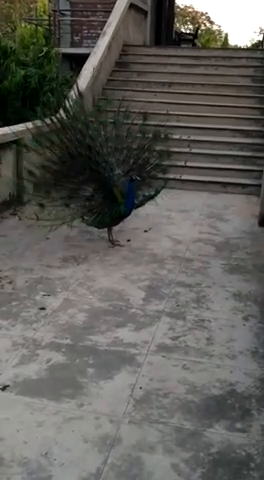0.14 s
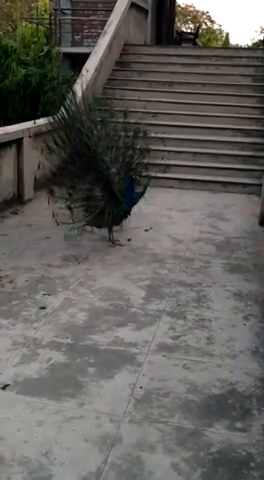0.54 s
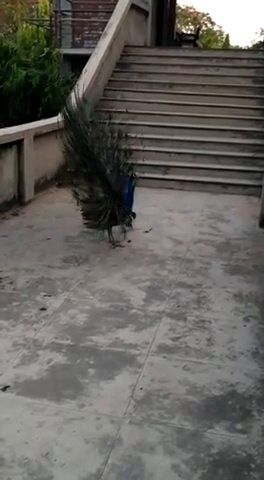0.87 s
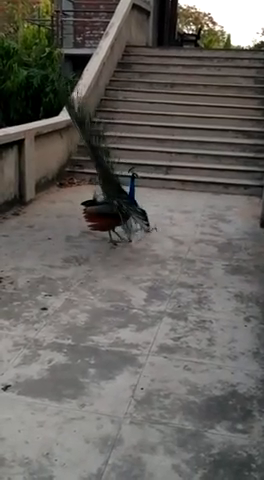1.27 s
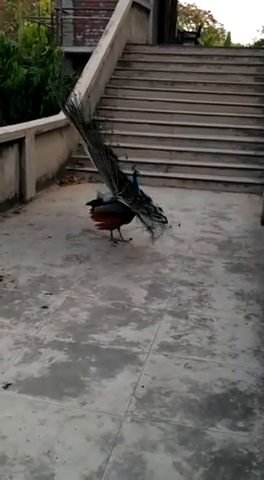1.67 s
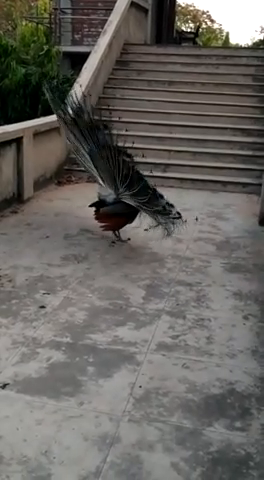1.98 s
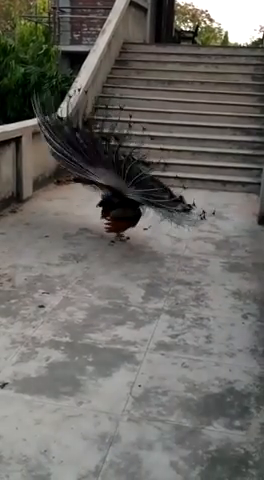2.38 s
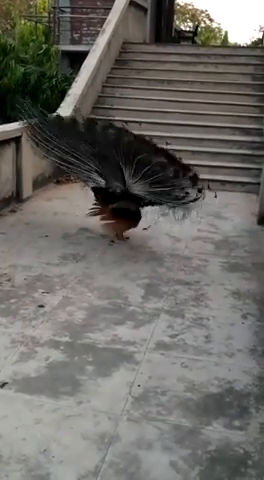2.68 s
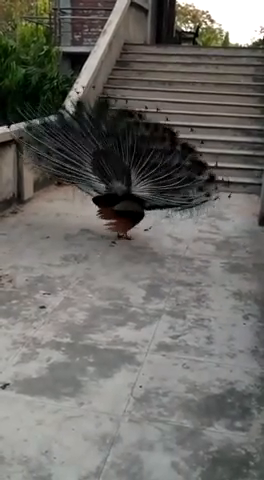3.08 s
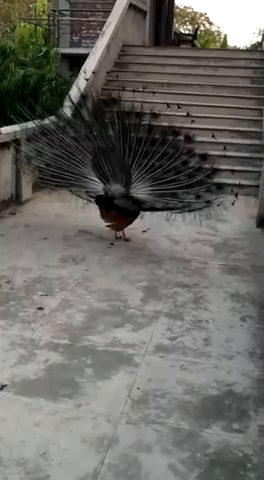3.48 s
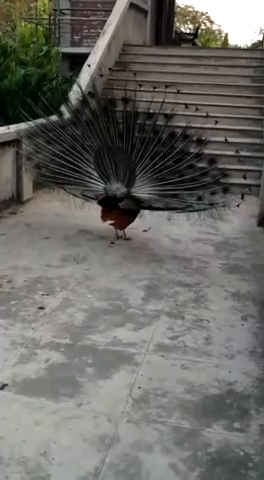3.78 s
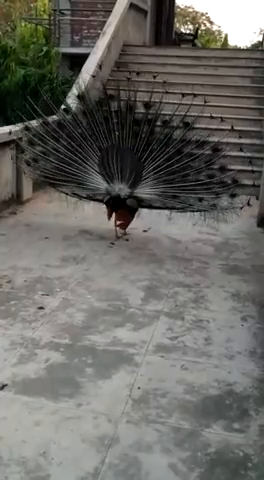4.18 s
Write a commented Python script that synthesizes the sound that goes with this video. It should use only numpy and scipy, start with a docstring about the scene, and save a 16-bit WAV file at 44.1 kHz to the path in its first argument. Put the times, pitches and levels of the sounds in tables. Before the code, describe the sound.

A quiet paved court with dull distant outdoor noise, a low wavering engine-like hum and a thin, very high whine throughout. A faint feather brush comes at 0.15 s, then a hard, dry click close to the microphone at 0.72 s. Soft airy brushes follow at about 1.2, 1.4 and 1.75 s. A small bird gives a hoarse peep near 1.4 s, then eight thin chirps slurring upward, roughly every quarter second from 1.5 to 3.2 s. Farther off, a soft low double hoot at 2.05 s leads to rough falling slurs until 2.3 s. The feather train flurries briefly at 2.4 s, then shivers from 2.6 s: crisp sizzling hiss, scraping shafts, light rattle and snapping quills, peaking around 2.8 to 2.9 s. It ebbs by 3.6 s with small ticks. Afterwards only faint brushes and the quiet background remain, the hum surging around 3.7 and 4.05 s.

```python
"""A peacock turns on a paved court and shivers its fanned train: stick-slip noise of barbs and shafts, ticking quills.
A small bird repeats a rising chirp (frayed gliding tones), others call farther off, and damped modes
make one sharp click close to the microphone. Under it lie a low wavering hum, distant outdoor noise
and a thin whine, all tones and filtered noise; steps and walls answer faintly with a diffuse tail."""
import sys
import numpy as np
from scipy import signal
from scipy.fft import rfft, irfft, next_fast_len
from scipy.io import wavfile
from scipy.ndimage import uniform_filter1d, map_coordinates

SR = 44100
rng = np.random.default_rng(int(sys.argv[2]) if len(sys.argv) > 2 else 0)


def log_audio(samples):
    """Write samples as a 16-bit WAV file to the path given in sys.argv[1]."""
    # one column per channel
    frames = np.atleast_2d(samples).T
    # limit to full scale, then quantise
    limited = np.clip(frames, -1, 1)
    pcm = np.round(limited * 32767).astype(np.int16)
    wavfile.write(sys.argv[1], SR, pcm)


N = 190776
T = np.arange(N) / SR  # time in s


def amp(db):
    """Decibels to amplitude gain."""
    return 10 ** (np.asarray(db) / 20)


def unit(x):
    """Normalisation to rms 1."""
    return x / np.sqrt(np.mean(x ** 2) + 1e-20)


def along(points, hz):
    """Interpolation of (pitch_hz, value) points on a logarithmic frequency axis."""
    f, v = np.transpose(points)
    return np.interp(np.log(hz + 1), np.log(f), v)


def filtered(x, response):
    """Linear filtering: the spectrum of x times a response of frequency."""
    size = next_fast_len(N + 8192)
    return irfft(rfft(x, size) * response(np.fft.rfftfreq(size, 1 / SR)), size)[:N]


def coloured(x, spectrum):
    """Spectral shaping: x filtered by (pitch_hz, level_db) points, at rms 1."""
    return unit(filtered(x, lambda hz: amp(along(spectrum, hz))))


def noise():
    """Fresh white Gaussian noise."""
    return rng.standard_normal(N)


def narrow(centre_hz, width_hz):
    """Resonance-shaped band of noise at rms 1."""
    return unit(filtered(noise(), lambda hz: 1 / (1 + ((hz - centre_hz) / width_hz) ** 2)))


def patchy(x, depth_db):
    """Time-frequency modulation: slow random patches of gain, at rms 1."""
    z = signal.stft(x, nperseg=1024)[2]
    field = uniform_filter1d(rng.standard_normal(z.shape), size=4, axis=0)
    field = uniform_filter1d(field, size=10, axis=1)
    return unit(signal.istft(z * amp(depth_db * unit(field)), nperseg=1024)[1][:N])


def wobble(rate):
    """Band-limited random modulation: a smooth curve with rate knots a second."""
    return map_coordinates(rng.standard_normal(2048), [T * rate], mode="wrap")


def bumps(rows):
    """Superposition of rounded humps from (middle_s, half_width_s, height) rows."""
    return sum(height * np.exp(-np.abs((T - s) / width) ** 3) for s, width, height in rows)


def fade(s, t60):
    """Free decay: a sudden start at s, then an exponential fall."""
    return (T >= s) * np.exp(-np.log(1000) * np.maximum(T - s, 0) / t60)


def swell(s, length, rise, t60):
    """Driven envelope: linear rise from s, exponential decay once length has passed."""
    return np.clip((T - s) / rise, 0, 1) * np.exp(-np.log(1000) * np.maximum(T - s - length, 0) / t60)


def slips(rate, spread_db, blur):
    """Stick-slip friction: impulses of unequal size over the blur of countless smaller ones."""
    sizes = noise() * amp(spread_db * np.clip(noise(), -2, 2))
    grains = (rng.random(N) < rate / SR) * sizes
    return unit(unit(grains) + blur * noise())


def whistle(rows, waver, flutter_db, rough):
    """Frequency and amplitude modulation: a tone along (start_s, pitch_hz, level_db), frayed by fast flutter."""
    s, hz, db = np.transpose(rows)
    pitch = uniform_filter1d(np.interp(T, s, hz), size=300) * (1 + waver * wobble(350))
    level = uniform_filter1d(amp(np.interp(T, s, db, left=-150, right=-150)), size=128)
    fray = 1 + rough * (wobble(hz.mean() / 6) + 1j * wobble(hz.mean() / 6))
    tone = np.imag(fray * np.exp(2j * np.pi * np.cumsum(pitch) / SR))
    return np.sqrt(2) * level * amp(flutter_db * wobble(160)) * tone


# spectral shape of the distant noise: pitch_hz [Hz], level_db [dB per Hz, relative]
OUTDOOR_SPECTRUM = [(20, -12.5), (45, -2), (65, 10.5), (130, 4.5), (220, -2.5), (400, -4.5), (900, -10),
                    (1500, -13.5), (2500, -20), (5000, -32), (9000, -32), (12500, -25.5), (14000, -26),
                    (15500, -42.5)]
# far-off swells: start_s [s], length_s [s], centre_hz [Hz], width_hz [Hz], level_db [dB]
FAR_SWELLS = [(0, 0.44, 1424, 110, -72), (0.265, 0.027, 1450, 170, -66), (1.213, 0.1, 1017, 249, -74),
              (2.062, 0.44, 950, 170, -70), (2.083, 0.14, 415, 78.6, -66.5),
              (2.341, 0.03, 1300, 250, -66.5), (4.197, 0.11, 910, 121.2, -74.5)]


def outdoors():
    """Broadband ambience: dull, shifting distant noise, with narrow-band swells passing through it."""
    drift = amp(.6 * wobble(5))
    out = amp(-65.5) * drift * coloured(patchy(noise(), depth_db=2.72), OUTDOOR_SPECTRUM)
    for s, length, centre_hz, width_hz, db in FAR_SWELLS:
        out += amp(db) * swell(s, length, rise=0.0053, t60=0.306) * narrow(centre_hz, width_hz)
    return out


# surges and dips of the hum: middle_s [s], half_width_s [s], level_db [dB change]
HUM_SURGES = [(1.52, 0.055, 6.5), (1.67, .03, -10), (3.01, 0.04, -13), (3.3, 0.14, 3), (3.46, .025, -13),
              (3.68, .095, 16), (3.865, 0.066, -19), (4.06, 0.14, 12)]
# faint overtones that do not surge: multiple [of the hum's pitch], level_db [dB before a slow waver]
HUM_OVERTONES = [(2, -81), (3, -82), (4, -83.5), (6, -82.5)]
HUM_HZ, HUM_DB, HUM_WAVER_DB = 98.8, -62.5, 1.37  # means of pitch and level; size of the waver
RUMBLE_DB, RUMBLE_HZ, RUMBLE_WIDTH_HZ = -13.5, 144, 43  # noise, in dB relative to the hum's strength


def hum():
    """Harmonic series: a wavering low tone like a distant engine; a rumble surges with its fundamental."""
    phase = 2 * np.pi * np.cumsum(HUM_HZ + 1.1 * wobble(14)) / SR
    strength = amp(HUM_DB + bumps(HUM_SURGES) + HUM_WAVER_DB * wobble(14))
    overtones = sum(amp(db + 2.5 * wobble(4.6)) * np.sin(k * phase) for k, db in HUM_OVERTONES)
    rumble = amp(RUMBLE_DB) * narrow(RUMBLE_HZ, RUMBLE_WIDTH_HZ)
    return strength * (np.sqrt(2) * np.sin(phase) + rumble) + np.sqrt(2) * overtones


def tones(lines):
    """Line spectrum: steady sines of random phase from (pitch_hz, level_db) rows."""
    return np.sqrt(2) * sum(amp(db) * np.sin(2 * np.pi * (hz * T + rng.random())) for hz, db in lines)


# lower cluster of the whine: pitch_hz [Hz], level_db [dB relative to the whine's level]
WHINE_CLUSTER = [(6202, -9), (6300, -1), (6502, -3)]
# steady tones above it: pitch_hz [Hz], level_db [dB]
STEADY_LINES = [(12500, -98.5), (13001, -85.5), (13103, -90)]
WHINE_REST_DB, WHINE_OPEN_DB = -84.5, -66  # the cluster's level in quiet, and its limit under strong treble
WHINE_OPENS_DB, WHINE_LAG_S = -81.5, .011  # treble level that opens it halfway; time constant


def whine(sound):
    """Level-dependent gain: the lower cluster and its hiss rise with other sound in their band; the top stays."""
    bed = coloured(noise(), [(3500, -14.0), (5000, -10.0), (6400, 3.5), (7400, -0.5), (8000, 0.5), (12000, -12.5)])
    cluster = tones(WHINE_CLUSTER) + amp(-8.0) * bed
    band = signal.butter(4, [4800, 6800], "band", fs=SR, output="sos")
    treble = signal.sosfilt(band, sound)
    power = np.abs(uniform_filter1d(treble ** 2, size=512))
    keep = np.exp(-1 / (WHINE_LAG_S * SR))
    opening = signal.lfilter([1 - keep], [1, -keep], power / (power + amp(WHINE_OPENS_DB) ** 2))
    level = amp(WHINE_REST_DB + (WHINE_OPEN_DB - WHINE_REST_DB) * opening)
    return level * cluster + tones(STEADY_LINES)


# decay of the court: pitch_hz [Hz], t60_s [s]
COURT_DECAY = [(200, 0.12), (1500, 0.39), (6000, 0.44), (14000, 0.24)]


def court(x):
    """Diffuse reverberation: steps and walls return a short tail, whose decay depends on frequency."""
    hz, t, z = signal.stft(rng.standard_normal(SR // 2), SR, nperseg=256)
    tail = signal.istft(z * amp(-60 * t / along(COURT_DECAY, hz)[:, None]), SR, nperseg=256)[1]
    return signal.fftconvolve(np.pad(x, (400, 0)), tail / np.linalg.norm(tail))[:N]  # delayed 400 samples


# notes of other birds: start_s [s], length_s [s], start_hz [Hz], end_hz [Hz], level_db [dB at mid-note]
BIRD_NOTES = [(2.029, 0.036, 775, 747, -58.5), (2.072, 0.047, 755, 748, -55.5),
              (2.105, 0.046, 3250, 2460, -70.5), (2.18, 0.026, 4180, 4070, -77),
              (2.204, 0.043, 4050, 3390, -64), (2.261, .034, 4300, 2704, -59),
              (2.278, 0.0398, 2797, 2365, -62)]
GLIDE_SETTLES = 1.9  # time constants of the falling pitch in one note


def other_birds():
    """Exponential glide: a soft double hoot and rough slurs swell and fade while the pitch falls and settles."""
    out = np.zeros(N)
    u = np.linspace(0, 1, 16)  # progress through a note
    fall = (1 - np.exp(-GLIDE_SETTLES * u)) / (1 - np.exp(-GLIDE_SETTLES))
    arch_db = -14 * (2 * u - 1) ** 2
    for s, length, start_hz, end_hz, db in BIRD_NOTES:
        note = np.transpose([s + length * u, start_hz + (end_hz - start_hz) * fall, db + arch_db])
        out += whistle(note, waver=.018, flutter_db=3.5, rough=.4)
    return out


# the hoarse opening note: start_s [s], length_s [s before its decay], level_db [dB]
HOARSE_NOTE = (1.385, .038, -64.5)
# chirps: start_s [s], shelf_length_s [s], top_length_s [s], start_hz [Hz], shelf_hz [Hz],
# shelf_level_db [dB], top_level_db [dB], both before flutter
CHIRP_ROWS = [(1.529, 0.04, 0.089, 5470, 5430, -61.5, -54.5), (1.769, 0.048, 0.072, 5200, 5340, -53.5, -53),
              (2.005, 0.046, 0.046, 5080, 5010, -48.5, -52.5),
              (2.244, 0.042, 0.041, 5120, 4990, -48.5, -49), (2.439, 0.086, 0.01, 4294, 4653, -55.5, -49.5),
              (2.673, .056, 0.015, 4350, 4855, -50.5, -56), (2.855, 0.065, 0.0053, 4355, 4680, -47.5, -52),
              (3.09, 0.051, 0.011, 4590, 4785, -49.5, -50.5)]
SLUR_S = 0.028  # length of the upward slur
CREST_HZ, USUAL_SHELF_HZ = 6520, 5130  # pitch of the top, and the shelf that leads to it
STRETCH = 0.36  # the lower the shelf, the higher the top: Hz per Hz


def songbird():
    """Frequency modulation: a hoarse noise note, then chirps of shelf, upward slur and top with a little hiss."""
    s, length, db = HOARSE_NOTE
    breath = coloured(noise(), [(4300, -39), (5200, -7.5), (6200, 5), (6900, -4.5), (8500, -20)])
    out = amp(db) * swell(s, length, rise=0.0088, t60=0.4) * breath
    haze = coloured(noise(), [(3500, -10), (5000, -27.0), (7000, 8.0), (8800, 16.0), (9500, 13), (10500, -23)])
    for s, shelf, top, start_hz, shelf_hz, shelf_db, top_db in CHIRP_ROWS:
        knee = s + shelf
        crest = s + shelf + SLUR_S
        top_hz = CREST_HZ + STRETCH * (USUAL_SHELF_HZ - shelf_hz)
        low = [(s, start_hz, shelf_db - 20),
               (s + .3 * shelf, (start_hz + shelf_hz) / 2, shelf_db - 2),
               (s + .6 * shelf, shelf_hz, shelf_db)]
        slur = [(knee, (shelf_hz + 5450) / 2, shelf_db - 2),
                (knee + .65 * SLUR_S, top_hz - 400, top_db),
                (crest, top_hz - 110, top_db - 2)]
        high = [(crest + top / 2, top_hz, top_db),
                (crest + top, top_hz - 170, top_db - 6),
                (crest + top + .008, top_hz - 300, top_db - 28)]
        out += whistle(low + slur + high, waver=.008, flutter_db=3.3, rough=.14)
        out += amp(top_db - 17.5) * swell(knee, SLUR_S + top, rise=0.051, t60=0.3) * haze
    return out


# modes the click rings with: pitch_hz [Hz], level_db [dB before the onset and high-pass], t60_s [s]
CLICK_RING = [(331, -8.5, 0.008), (989, -9.5, 0.004), (1347, -19.5, 0.0043), (2090, -25, 0.0047),
              (3760, -11, 0.004), (5330, -20, 0.0035), (8600, -21.5, 0.0018), (13100, -22, 0.0031),
              (13700, -25.5, 0.0037)]
# contacts that crackle: start_s [s], level_db [dB relative to the crackle's level]
CRACKLE_CONTACTS = [(0.722, -15), (0.7217, -2), (0.7226, 9.5), (.7248, -20.5)]
CLICK_S = .7221  # start of the ringing


def click():
    """Damped modal vibration: a hard, dead tap close by, a few milliseconds of crackle and a scattered tail."""
    age = np.maximum(T - CLICK_S, 0)
    ring = sum(amp(db) * fade(CLICK_S, t60) * np.cos(2 * np.pi * hz * age) for hz, db, t60 in CLICK_RING)
    ring = ring * (1 - np.exp(-age / .0001))  # onset of 0.1 ms
    contacts = sum(amp(db) * fade(s, t60=0.0031) for s, db in CRACKLE_CONTACTS)
    crack = amp(-17.5) * contacts * coloured(noise(), [(2000, -33.5), (6000, -1), (12000, 8), (16000, 3.5)])
    scatter = coloured(noise(), [(100, 2.0), (300, 6.0), (1400, -3.5), (3000, -15.5), (9000, -22.5)])
    scatter = amp(1.5 * wobble(89.9)) * scatter
    high_pass = signal.butter(2, 110, "high", fs=SR, output="sos")  # too small to push deep bass
    tap = signal.sosfilt(high_pass, ring + crack)
    return tap + amp(-52.5) * swell(CLICK_S, 0.037, rise=0.00302, t60=0.15) * scatter


# spectral shapes of the fine barbs and of the shafts: pitch_hz [Hz], level_db [dB per Hz, relative]
BARB_SPECTRUM = [(3820, -32), (6500, -8), (7030, -12), (8530, -7.5), (9710, 0.5), (11700, 1), (13100, 1),
                 (14600, -3), (15300, -2), (15800, -18.5)]
SHAFT_SPECTRUM = [(1000, -37), (2000, -12), (2700, -3.5), (3500, 3), (4400, 0.5), (5200, -3), (7000, -11.5),
                  (9000, -20.5), (12000, -47)]
# quills knocking together: start_s [s], level_db [dB before smoothing], t60_s [s]
QUILL_KNOCKS = [(1.785, -57, 0.018), (2.589, -41, .012), (2.6861, -29.5, 0.013), (2.755, -32, .004),
                (2.7807, -28, 0.015), (2.801, -28.5, .017), (2.9283, -22, .005), (3.22, -36, 0.04),
                (3.244, -36.5, 0.089), (3.31, -40.5, 0.04), (3.338, -41, 0.078), (3.399, -48, 0.072),
                (3.43, -50, .03), (3.48, -53.5, .03)]


def quills():
    """Impulsive excitation: stiff quills snap past each other, each in a short bright burst."""
    blows = sum(amp(db) * fade(s, t60) for s, db, t60 in QUILL_KNOCKS)
    burst = coloured(noise(), BARB_SPECTRUM) + amp(-11.0) * coloured(noise(), SHAFT_SPECTRUM)
    return uniform_filter1d(blows, size=24) * burst


# short brushes of the train: start_s [s], hiss_level_db [dB], length_s [s before the decay],
# scrape_level_db [dB relative to the hiss], edge_hz [Hz, lower edge of the hiss]
TRAIN_BRUSHES = [(0.143, -60, 0.065, -22.5, 12200), (0.73, -61, 0.058, -17.5, 6000),
                 (1.167, -54.5, 0.039, -15, 9200), (1.429, -56.5, 0.051, -32, 12870),
                 (1.614, -70.5, 0.013, -20, 7800), (1.748, -64, 0.049, -17, 12200),
                 (2.253, -58.5, 0.091, -16, 12200), (3.5, -63, .035, -18, 12000),
                 (3.639, -78, 0.14, -10.5, 8000), (3.908, -76, .04, -18.5, 7960)]


def brushes():
    """Light friction: feathers touch as the bird steps round, mostly a high hiss with a fainter scrape."""
    out = np.zeros(N)
    for s, db, length, scrape_db, edge_hz in TRAIN_BRUSHES:
        barbs = coloured(slips(rate=2500, spread_db=4, blur=1.1), BARB_SPECTRUM)
        hiss = unit(filtered(barbs, lambda hz: 0.17 + 1 / (1 + (edge_hz / (hz + 1)) ** 30)))
        scrape = amp(scrape_db) * coloured(noise(), SHAFT_SPECTRUM)
        out += amp(db) * swell(s, length, rise=0.022, t60=0.16) * (hiss + scrape)
    return out


# effort of the long shiver, a first flurry, then a swell and a slow ebb:
# start_s [s], level_db [dB of barb hiss before jolts and clumping]
SHIVER_EFFORT = [(2.33, -71), (2.395, -42.5), (2.46, -48.5), (2.49, -52), (2.7, -41), (2.81, -32.5),
                 (2.845, -36.5), (3.1, -41.5), (3.25, -44), (3.28, -49), (3.4, -51), (3.53, -67),
                 (3.62, -81)]
# harder jolts, which throw shafts and stems together: middle_s [s], level_db [dB added to the shafts]
SHIVER_JOLTS = [(2.461, 7), (2.625, 2.5), (2.727, 3.5), (2.823, 5), (2.902, 5.5), (2.955, 5), (3.171, 7),
                (3.228, 2.5), (3.31, 6.5), (3.402, 4)]
# spectral shape of the heavy stems: pitch_hz [Hz], level_db [dB per Hz, relative]
STEM_SPECTRUM = [(150, -60), (400, -33), (700, -6), (950, 14.5), (1400, 12), (1900, 14), (2400, 17),
                 (3200, -18), (6000, -23)]
FULL_EFFORT_DB = -36  # hiss level taken as full effort
SCRAPE_DB, SCRAPE_GROWS = -47, 1.06  # shafts at full effort; dB gained per dB of effort
RATTLE_DB, RATTLE_GROWS = -62.5, 1.4  # the same for the heavy stems
JOLT_S = 0.012  # half width of a jolt
JOLT_HISS, JOLT_RATTLE = 0.37, 1.46  # how barbs and stems feel a jolt, relative to the shafts


def shiver():
    """Stick-slip under one effort: barbs hiss; shafts scrape and stems rattle more as it grows or jolts."""
    effort_db = np.interp(T, *np.transpose(SHIVER_EFFORT), left=-150, right=-150) - FULL_EFFORT_DB
    jolt_db = bumps([(s, JOLT_S, db) for s, db in SHIVER_JOLTS])
    clumps = amp(0.7 * wobble(55) + 1.35 * wobble(330))
    hiss = coloured(slips(rate=6000, spread_db=2.5, blur=1), BARB_SPECTRUM)
    hiss = amp(FULL_EFFORT_DB + effort_db + JOLT_HISS * jolt_db) * hiss
    scrape = coloured(slips(rate=2500, spread_db=3, blur=.8), SHAFT_SPECTRUM)
    scrape = amp(SCRAPE_DB + SCRAPE_GROWS * effort_db + jolt_db) * scrape
    rattle = coloured(slips(rate=640, spread_db=1.0, blur=1.0), STEM_SPECTRUM)
    rattle = amp(RATTLE_DB + RATTLE_GROWS * effort_db + JOLT_RATTLE * jolt_db) * rattle
    near = clumps * (hiss + scrape + rattle)
    # the paving sends a copy 3.8 ms later, which ripples the spectrum
    return filtered(near, lambda hz: 0.91 + 0.23 * np.exp(-2j * np.pi * hz * 0.0038))


def scene():
    """Direct-to-reverberant balance: the train is near and dry, the farther birds carry more of the court."""
    train = shiver() + brushes() + quills()
    song = songbird()
    others = other_birds()
    echo = court(amp(-16.5) * train + amp(-12.5) * song + amp(-5.5) * others)
    events = train + song + others + echo + click()
    return (events + hum() + outdoors() + whine(events))[None]


TOP_HZ = 15850  # band limit of the microphone


def record(dry):
    """Soft saturation and band limiting: the microphone rounds off tall peaks and cuts the extreme treble."""
    rounded = dry[0] / (1 + (np.abs(dry[0]) / .48) ** 4) ** .25
    return filtered(rounded, lambda hz: 1 / np.sqrt(1 + (hz / TOP_HZ) ** 200))[None]


dry = scene()
out = record(dry)
log_audio(out)
```